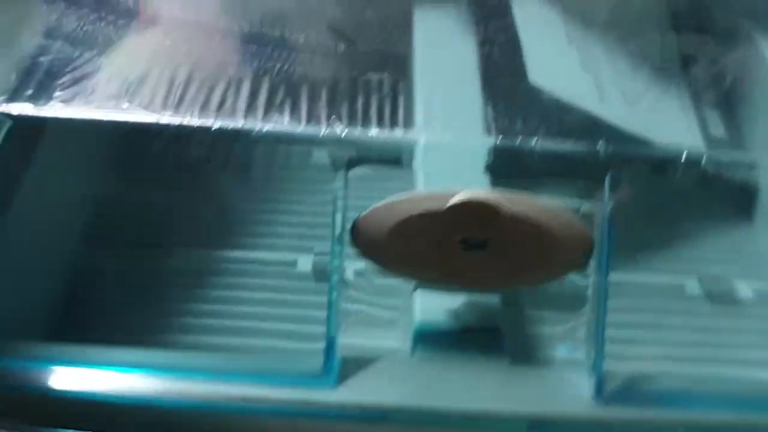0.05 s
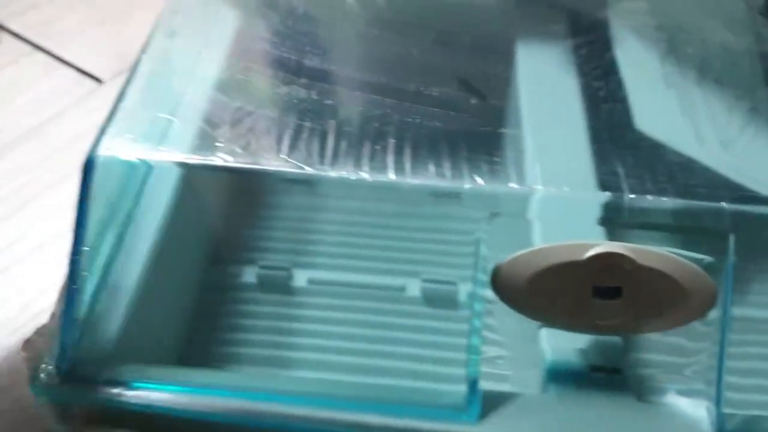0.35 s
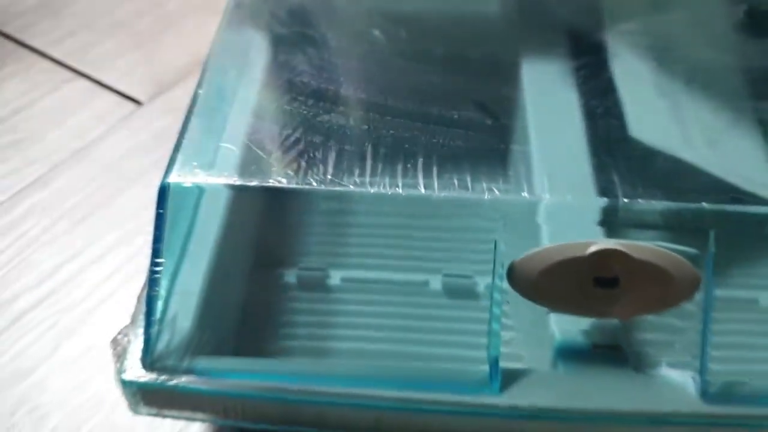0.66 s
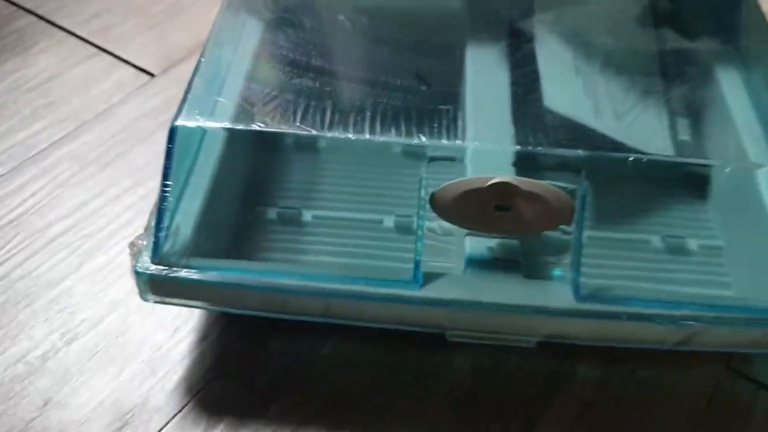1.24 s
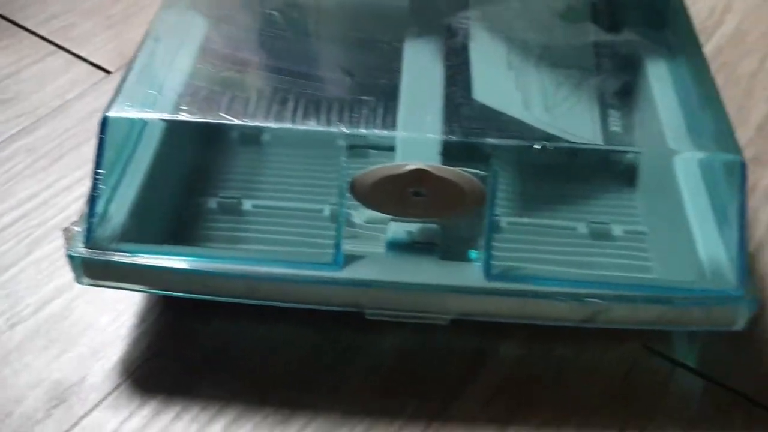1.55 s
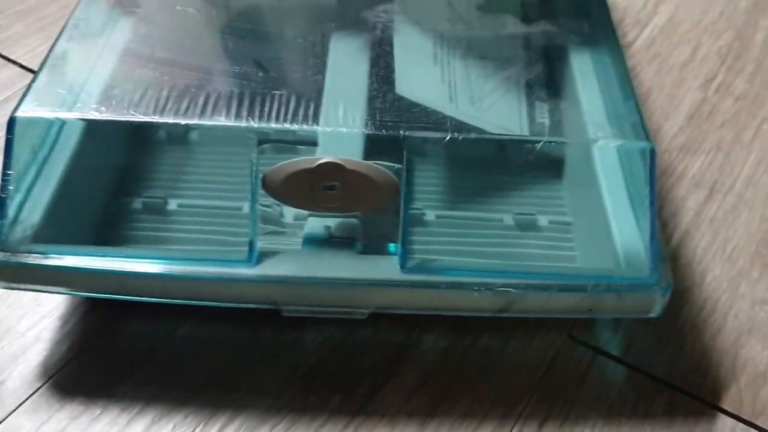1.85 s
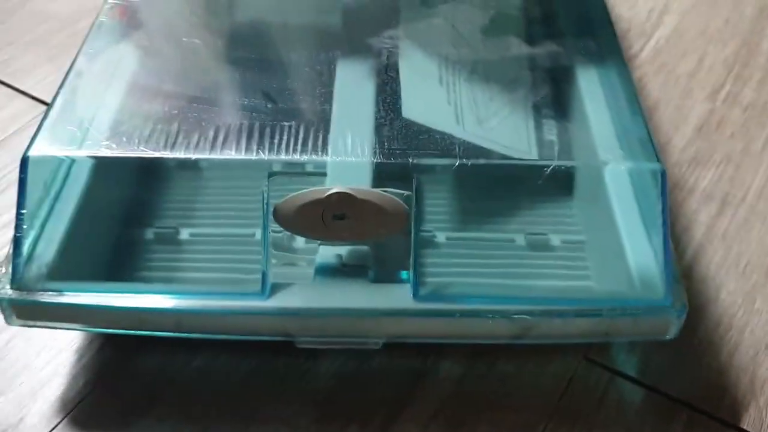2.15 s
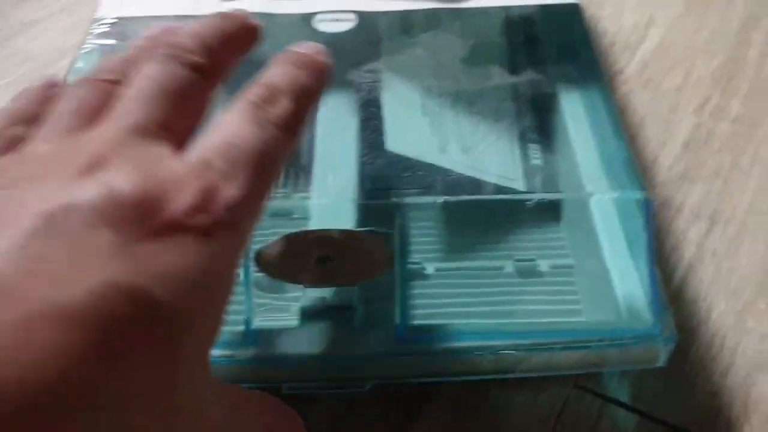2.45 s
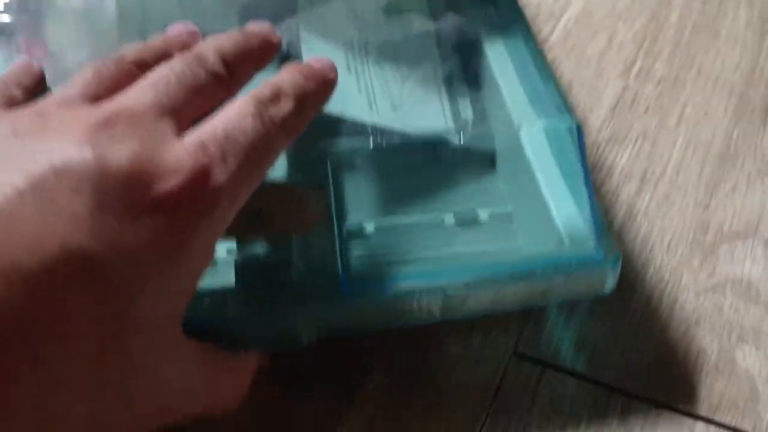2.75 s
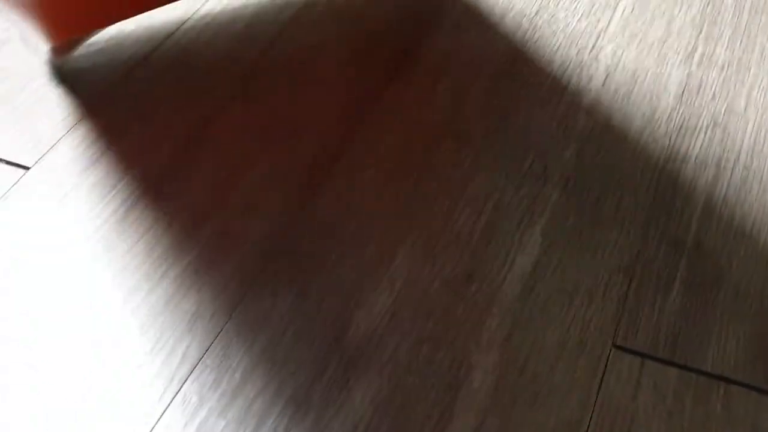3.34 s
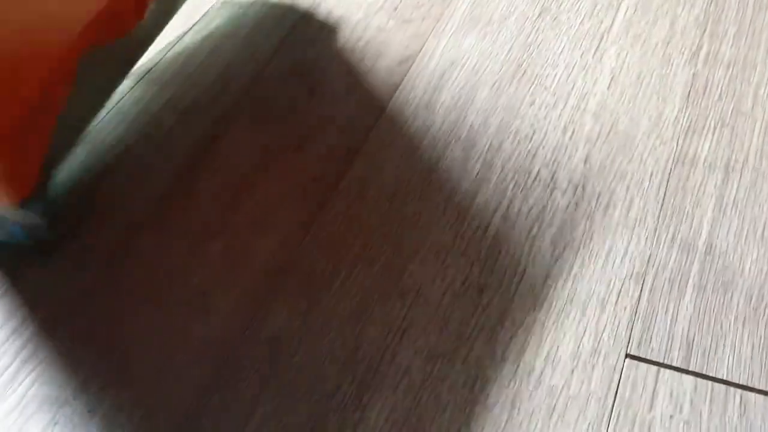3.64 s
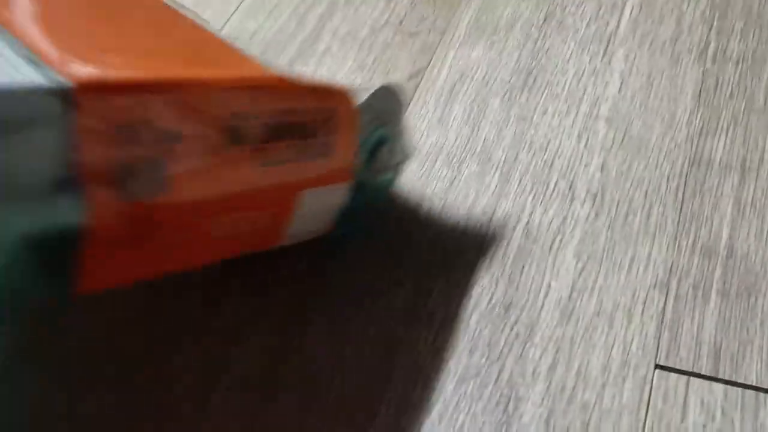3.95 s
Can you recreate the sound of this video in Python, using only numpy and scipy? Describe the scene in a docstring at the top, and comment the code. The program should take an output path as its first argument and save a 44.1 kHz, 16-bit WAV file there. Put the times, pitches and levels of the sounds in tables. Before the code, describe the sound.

Close up in a small humming room, a shrink-wrapped plastic box is set down with a hollow knock. After faint ticks and squeaks of wrap, it drags in rough, squealing strokes, ending in a cluster of loud knocks.

```python
"""A shrink-wrapped plastic storage box is handled close to a phone, in a small room with a machine hum.
First it scrapes and is set down on the floor with a knock that booms in its hollow and rings its walls.
For the next two seconds the tight wrap faintly squeaks, ticks and hisses under the gripping hand.
Near 3 s the box is dragged: its edge sticks and slips, scraping and squealing in rough strokes.
Last, from about 3.6 s, it is lifted with a cluster of loud knocks."""
import sys
import numpy as np
from scipy import signal
from scipy.fft import rfft, irfft
from scipy.io import wavfile

SR = 44100
rng = np.random.default_rng(int(sys.argv[2]) if len(sys.argv) > 2 else 0)


def master_out(mix):
    """Clip the mix to full scale and print it as 16-bit PCM to the path in sys.argv[1]."""
    frames = np.transpose(np.atleast_2d(mix))
    ceiling = np.clip(frames, -1, 1)
    pcm = np.round(ceiling * 32767).astype(np.int16)
    wavfile.write(sys.argv[1], SR, pcm)


N = 176400
T = np.arange(N) / SR
FREQS = np.maximum(np.arange(N // 2 + 1) * SR / N, 1)
TREBLE_HZ = 1592  # where the shell's treble begins

# the bright tone of the wrap's thin film: f/Hz, level/dB
FILM_COLOUR = [(1000, -29), (3000, -5.5), (6500, 2), (8800, -8), (11500, -1), (15500, -3)]


def amp(db):
    """Turn decibels into a gain."""
    return 10 ** (np.asarray(db) / 20)


def unit(x):
    """Scale a signal to an average (rms) level of 1."""
    return x / np.sqrt(np.mean(x ** 2))


def colour(points):
    """A gain for each frequency, drawn through (f/Hz, level/dB) points."""
    hz, db = np.array(points).T
    return amp(np.interp(np.log(FREQS), np.log(hz), db))


def peak(hz, width):
    """A gain for each frequency: one resonance, strongest at hz."""
    return 1 / np.hypot(1, (FREQS ** 2 - hz ** 2) / (FREQS * width))


def stereo(pair, gain):
    """Filter two unrelated signals and mix them to left and right, alike in the bass; rms 1."""
    # stereo width, as side compared with mid: f/Hz, level/dB
    spread = [(160, -22), (240, -10.5), (500, -6), (1000, -2.5), (2000, 0.5)]
    mid, side = rfft(pair) * gain
    side = side * colour(spread)
    return unit(irfft(np.array([mid + side, mid - side]), N))


def noise(gain):
    """Stereo noise with the given gain at each frequency."""
    return stereo(rng.standard_normal((2, N)), gain)


def swell(start, end, rise, fall):
    """Loudness of a stroke: rise, hold until the end, then die away."""
    return np.clip((T - start) / rise, 0, 1) * np.exp(-np.maximum(T - end, 0) / fall)


def ring(t, rise, t60):
    """Loudness of a blow: rise, then fade by 60 dB every t60 seconds."""
    return np.minimum(t / rise, 1) * np.exp(-np.log(1000) * np.maximum(t - rise, 0) / t60)


def tone(t, hz):
    """A pure tone that reaches the left microphone just after the right."""
    lag_s = np.array([[0.00011], [0]])
    return np.sqrt(2) * np.sin(2 * np.pi * hz * (t - lag_s))


def after(start):
    """The quarter second after a blow: its samples and a clock that starts at zero."""
    first = min(int(start * SR), N - 1)
    span = slice(first, first + SR // 4)
    return span, T[span] - T[first]


def background():
    """The room's low rumble, with a machine's wavering hum and faint whine."""
    # the quiet room: f/Hz, level/dB
    room_tone = [(22, -47), (69, -9), (79, -18.5), (101, 0.5), (148, -27.5), (198, -23), (246, -35),
                 (340, -30.5), (540, -37), (997, -56), (9000, -70), (12000, -65), (15500, -62.5)]
    # the hum and the whine: f/Hz, width/Hz, level/dB
    hums = [(101.1, 12.7, -46), (1342, 98, -72.5)]
    rumble = amp(-46) * noise(colour(room_tone))
    return rumble + sum(amp(db) * noise(peak(hz, width) ** 2) for hz, width, db in hums)


def room(x):
    """Echoes from the nearby walls blur into a short tail."""
    t = T[:SR // 2]
    tail = rng.standard_normal((2, len(t))) * ring(t, rise=0.0012, t60=0.19)
    echoes = signal.fftconvolve(x, unit(tail) / np.sqrt(len(t)), axes=1)[:, :N]
    return x + amp(-7.5) * echoes


def slips(per_second=2600, scatter_db=3):
    """Rubbing surfaces catch and let go, making dense clicks of uneven size."""
    size = amp(scatter_db * rng.standard_normal(N))
    return np.sign(rng.standard_normal((2, N))) * size * (rng.random(N) < per_second / SR)


def wrap_hiss():
    """The thin film slides under the hand with a fine crinkling hiss."""
    # slides of the wrap: start/s, end/s, rise/s, fall/s, level/dB
    rubs = [(-.02, 0.11, .01, 0.009, -57), (0.924, 0.953, 0.015, 0.0049, -57),
            (2.578, 2.593, 0.033, 0.06, -56), (2.994, 3.135, 0.012, 0.075, -57),
            (3.29, 3.56, 0.14, 0.018, -52), (3.596, 3.764, 0.0081, 0.008, -44)]
    hiss = stereo(slips(), colour(FILM_COLOUR))
    return sum(swell(start, end, rise, fall) * amp(db) * hiss for start, end, rise, fall, db in rubs)


def squeaks(steadiness=0.46):
    """Rubbing locks onto one resonance, which swells and glides as the pressure shifts."""
    # high, faint film and low, loud edge: start/s, end/s, level/dB, first f/Hz, last f/Hz, width/Hz
    glides = [(.53, .655, -71.5, 6180, 5870, 2400), (0.817, 0.911, -70, 5540, 5750, 745),
              (.912, 0.956, -54.5, 5480, 5460, 700), (2.126, 2.192, -70.5, 5600, 5480, 1700),
              (3.142, 3.221, -31.5, 973, 983, 70), (3.259, 3.371, -26.5, 1457, 1708, 179),
              (3.368, 3.475, -28, 1523, 1609, 140), (3.872, 3.912, -29, 874, 639, 243)]
    out = 0
    for start, end, db, start_hz, end_hz, width in glides:
        progress = np.clip((T - start) / (end - start), 0, 1)
        band = signal.hilbert(noise(peak(start_hz, width) ** 2))
        pitch_shift = np.exp(2j * np.pi * np.cumsum((end_hz - start_hz) * progress) / SR)
        squeak = unit((band * pitch_shift).real / np.abs(band) ** steadiness)  # evens out the flutter
        out = out + amp(db) * np.sin(np.pi * progress) * squeak
    return out


def judder(rate_hz=31, depth_db=2.32):
    """The edge presses on the floor with a quick, random wobble."""
    wobble = irfft(rfft(rng.standard_normal(N)) / (1 + (FREQS / rate_hz) ** 4), N)
    return amp(depth_db * unit(wobble))


def ripple(depth_db=4, width_hz=88):
    """The shell's many small, crowded resonances make its treble gain bumpy."""
    window = np.hanning(int(2 * width_hz * N / SR))
    bumps = unit(np.convolve(rng.standard_normal(len(FREQS)), window, "same"))
    return amp(depth_db * bumps * np.minimum(FREQS / TREBLE_HZ, 1) ** 2)


def scraping(contact_db=8, contact_octaves=0.41):
    """The edge sticks and slips; each stroke favours one pitch range and makes the hollow box drone."""
    # scrapes: start/s, end/s, rise/s, fall/s, rasp level/dB, contact f/Hz, treble/dB, drone level/dB
    strokes = [(-.02, 0.136, 0.018, 0.009, -38.5, 780, 2.5, -40),
               (0.833, 0.983, .02, 0.024, -69.5, 1030, 2.5, -80),
               (2.583, 2.796, 0.021, 0.089, -62, 850, 0.5, -65),
               (2.936, 3.124, 0.19, 0.04, -37, 950, 0.5, -40),
               (3.126, 3.215, 0.04, 0.066, -31, 1220, -2, -43),
               (3.259, 3.464, 0.083, 0.0062, -27.5, 1390, 11, -40.5),
               (3.455, 3.589, 0.027, 0.029, -32, 1010, 9.5, -34.5),
               (3.601, 3.706, 0.058, 0.01, -35.5, 806, 9, -27),
               (3.88, 4.003, 0.0063, .02, -34, 724, -6, -34)]
    # overall tone of the sliding edge: f/Hz, level/dB
    slide_colour = [(150, -19), (350, -3), (700, -3), (1500, -5.5), (1850, -5), (4800, -15.5), (9000, -30),
                    (16000, -37.5)]
    # resonances of the sliding shell: f/Hz, width/Hz, level/dB
    shell_peaks = [(440.5, 57, 11.5), (651, 96, 14.5), (984, 47, 11), (1317, 86, 5.5), (1565, 128, 8.5),
                   (2876, 190, 4), (4550, 260, 4.5)]
    resonances = np.sqrt(1 + sum((amp(db) * peak(hz, width)) ** 2 for hz, width, db in shell_peaks))
    shell = colour(slide_colour) * ripple() * resonances
    friction = slips() * judder()
    drone = noise(peak(hz=200.8, width=82) ** 2)
    treble = 1 / (1 + (TREBLE_HZ / FREQS) ** 4)
    out = 0
    for start, end, rise, fall, rasp_db, contact_hz, treble_db, drone_db in strokes:
        contact = np.exp(-.5 * (np.log2(FREQS / contact_hz) / contact_octaves) ** 2)
        rasp = stereo(friction, shell * amp(contact_db * contact + treble_db * treble))
        out = out + swell(start, end, rise, fall) * (amp(rasp_db) * rasp + amp(drone_db) * drone)
    return out


def ticks(clatter, crack, snap):
    """The wrap and lid give short, light ticks."""
    # ticks: t/s, wall level/dB, crack level/dB, snap level/dB, left over right/dB
    hits = [(0.172, -30.5, -46, -45, -2), (1.048, -51.5, -53.5, -43.5, 2.5),
            (2.078, -56, -56, -55.5, -16.5), (2.093, -51.5, -64, -55.5, -15), (2.928, -41, -52.5, -58, 0),
            (2.9562, -41, -31.5, -33, 1), (3.062, -38.5, -47, -44, 1), (3.852, -36, -36, -59, 0)]
    out = np.zeros((2, N))
    for start, wall_db, crack_db, snap_db, pan_db in hits:
        span, t = after(start)
        hit = amp(wall_db) * clatter[:, span] + amp(crack_db) * crack[:, span]
        hit += amp(snap_db) * snap[:, span]
        out[:, span] += hit * ring(t, rise=0.0013, t60=0.048) * amp([[pan_db / 2], [-pan_db / 2]])
    return out


def wall_ring(t, rise, tilt_db, detune=0.0098):
    """Struck walls ring at their own pitches, a little differently with each blow."""
    # natural tones of the walls: f/Hz, level/dB, t60/s
    modes = [(439.6, -3, 0.056), (559.6, 3.5, 0.039), (721.7, -3.5, 0.14), (926.6, 4.5, 0.038),
             (1094, -8, 0.093), (1283, -7, 0.072), (1466, -2.5, 0.044), (1690, -23.5, 0.038)]
    mode_hz, mode_db, mode_t60 = np.array(modes).T
    chance = rng.standard_normal((len(modes), 2))
    gains = amp(mode_db + tilt_db * np.log2(mode_hz))
    out = 0
    for hz, gain, t60, (push, shift) in zip(mode_hz, gains, mode_t60, chance):
        out = out + gain * np.sign(push) * tone(t, hz * (1 + detune * shift)) * ring(t, rise, t60)
    return out / np.linalg.norm(gains)


def knocks(clatter, crack, snap):
    """Each knock booms in the hollow, rings the walls, gives a sharp crack and snaps the wrap."""
    # knocks: t/s, rise/s, boom level/dB, boom f/Hz, wall level/dB, wall tilt/(dB per octave),
    # crack level/dB, snap level/dB
    hits = [(0.1484, 0.00056, -40, 168.4, -15, 6.5, -24, -36),
            (2.082, 0.0063, -32, 64.5, -46, -39, -80, -65), (2.787, 0.0038, -28, 205, -37, 2.5, -63, -86),
            (3.386, 0.0016, -38, 187, -20, -2, -24.5, -70), (3.583, 0.0046, -25, 233, -10, 9.5, -21, -21.5),
            (3.595, 0.0017, -16, 215, -17, -3, -32, -60), (3.7455, 0.0037, -17.5, 191, -5.5, -2, -27, -39),
            (3.7536, 0.00067, -21.5, 310, -9, -2.5, -32.5, -44),
            (3.769, 0.0021, -20.5, 194, -20.5, -10, -42, -63), (3.798, 0.007, -29.5, 81, -24, -3, -33, -64),
            (3.869, 0.0094, -49, 180, -29, 5, -35, -51), (3.9978, 0.00037, -21, 200, -12.5, -16, -10, -33)]
    out = np.zeros((2, N))
    for start, rise, boom_db, boom_hz, wall_db, tilt_db, crack_db, snap_db in hits:
        span, t = after(start)
        walls = amp(-6) * wall_ring(t, rise, tilt_db)
        walls += amp(-11) * clatter[:, span] * ring(t, rise, t60=0.045)
        out[:, span] += amp(boom_db) * tone(t, boom_hz) * ring(t, rise, t60=0.081)
        out[:, span] += amp(wall_db) * walls
        out[:, span] += amp(crack_db) * crack[:, span] * ring(t, rise, t60=0.05)
        out[:, span] += amp(snap_db) * snap[:, span] * ring(t, rise / 2, t60=0.039)
    return out


def blows():
    """Knocks and ticks shake the same plastic, so they share its clatter, crack and snap."""
    # dull clatter of the walls: f/Hz, level/dB
    clatter_colour = [(150, -23.5), (330, 6), (700, 1.5), (1500, -2.5), (1900, -7), (9000, -66.5)]
    # sharp crack of the shell: f/Hz, level/dB
    crack_colour = [(800, -28), (1800, -2.5), (2600, 1.5), (5200, -7.5), (9000, -27.5), (16000, -39)]
    clatter, crack, snap = (noise(colour(c)) for c in (clatter_colour, crack_colour, FILM_COLOUR))
    return knocks(clatter, crack, snap) + ticks(clatter, crack, snap)


def scene():
    """The handled box in its humming room."""
    return room(blows() + scraping() + squeaks() + wrap_hiss()) + background()


def record(dry, top_hz=15900):
    """The phone cuts off the highest treble."""
    return signal.sosfilt(signal.ellip(8, .2, 70, top_hz, fs=SR, output="sos"), dry)


dry = scene()
out = record(dry)
master_out(out)
```